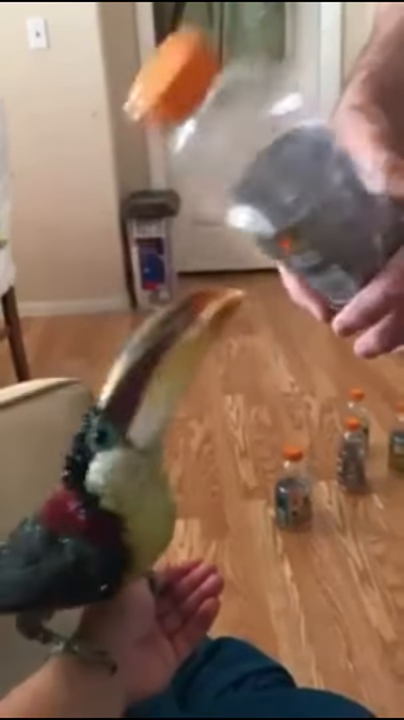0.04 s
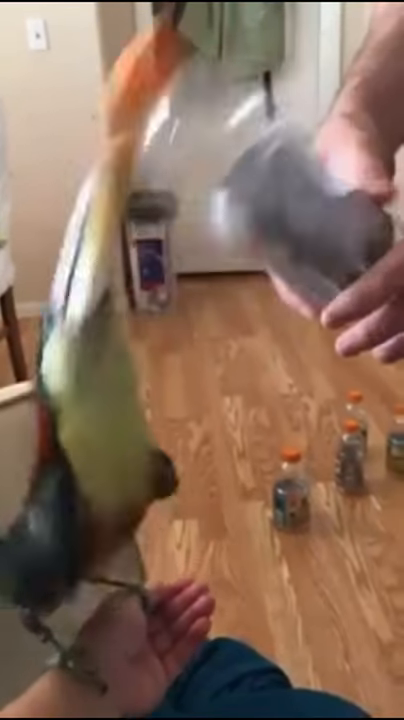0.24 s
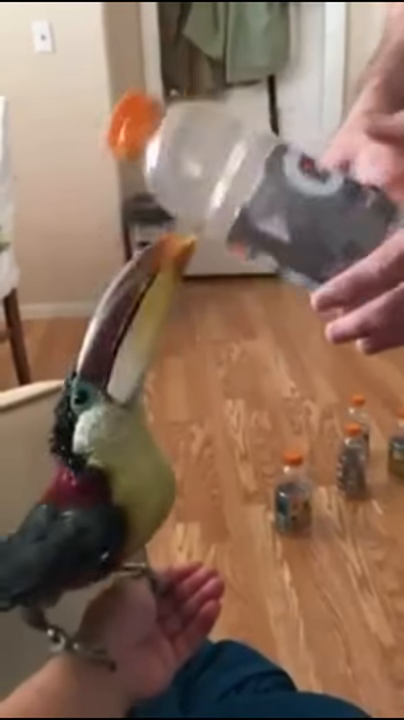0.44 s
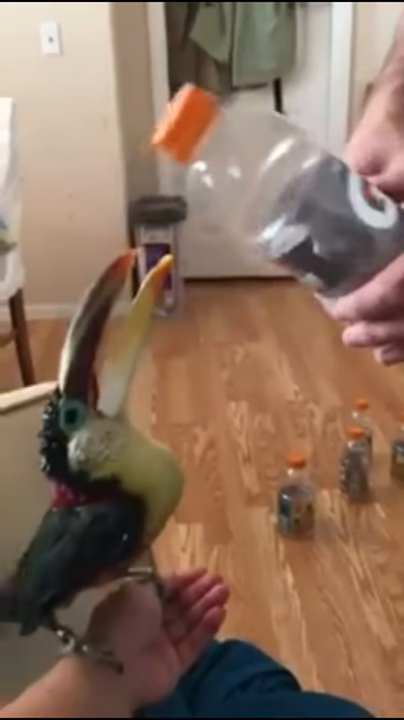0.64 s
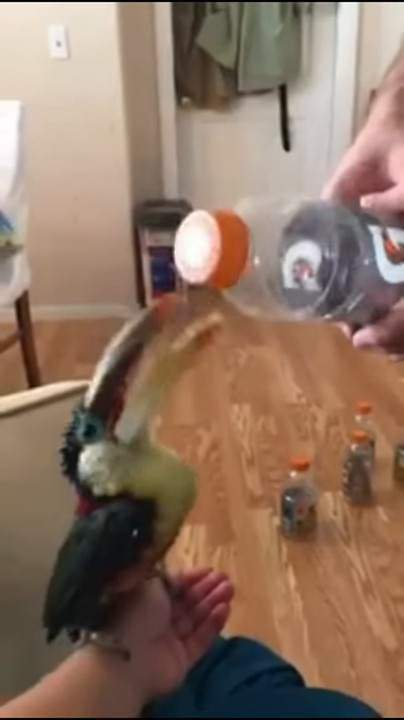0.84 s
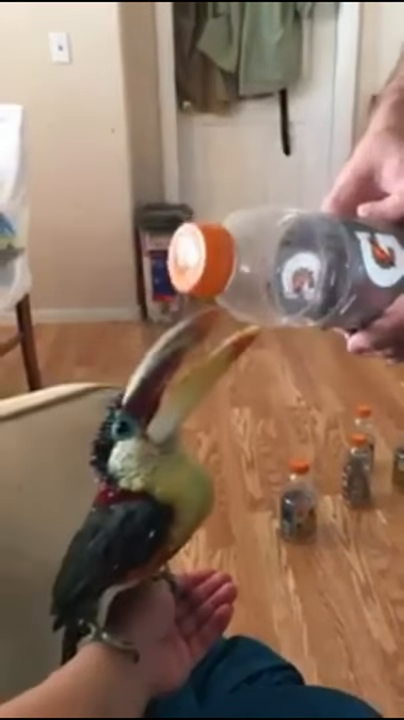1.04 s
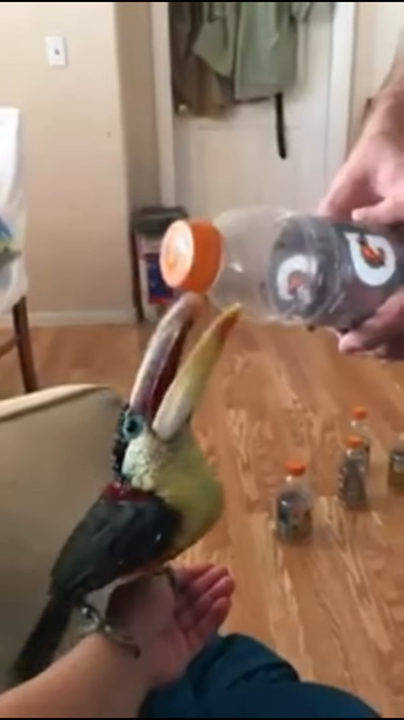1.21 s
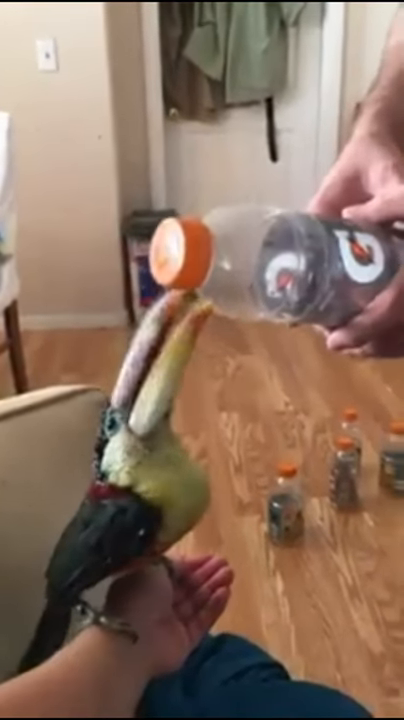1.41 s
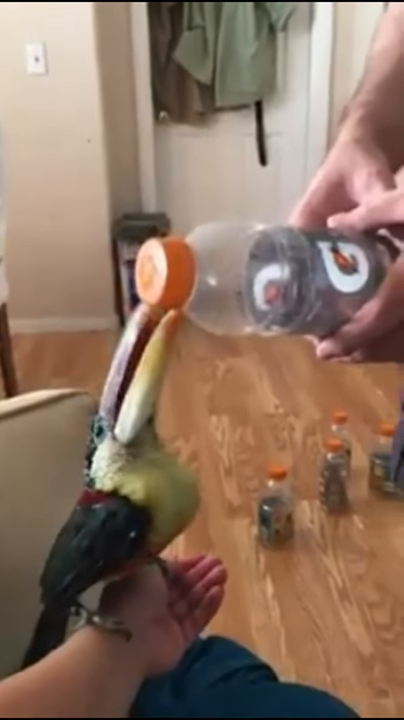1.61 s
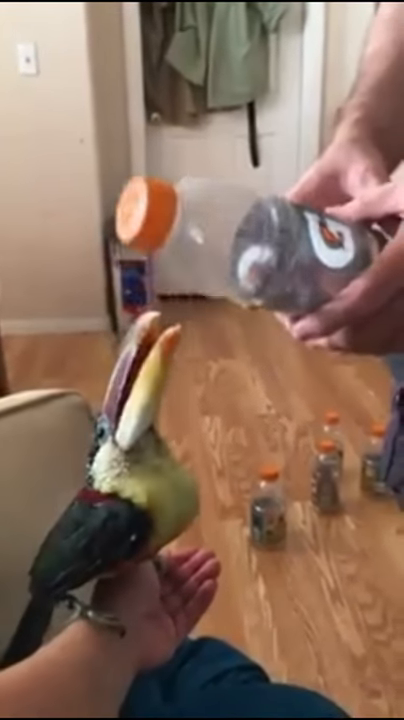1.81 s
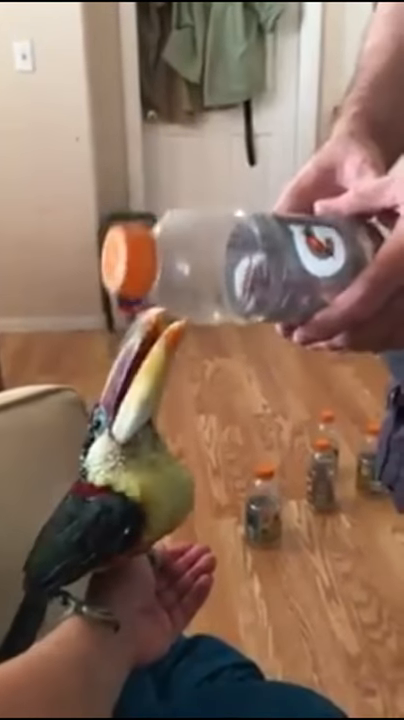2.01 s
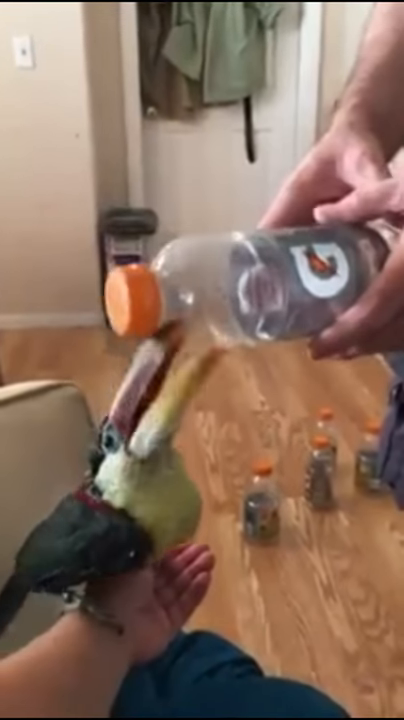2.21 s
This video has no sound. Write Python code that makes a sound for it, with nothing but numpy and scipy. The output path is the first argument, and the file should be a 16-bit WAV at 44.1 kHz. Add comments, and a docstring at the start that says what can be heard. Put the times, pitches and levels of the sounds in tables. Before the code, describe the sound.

A bird's bill knocks on a plastic bottle close by in a small room. An earlier knock fades at the start, then the loudest hit, a quick hollow clatter, comes at about 0.2 seconds. Lighter taps follow near 1.1 seconds, faintly at 1.45, and as a pair around 2.1 and 2.2. Faint handling rustles and ticks fill the gaps over a low, steady hum.

```python
"""A knock is dying away over a low hum in a small room; then a bird raps its bill on a hand-held
plastic bottle near the microphone. Each contact is a brief chatter that cracks, rings the bottle's
wall and gives a hollow knock, and the room answers. Faint rustles and ticks of handling lie
between the blows."""
import sys
import numpy as np
from scipy import signal
from scipy.fft import rfft, irfft
from scipy.io import wavfile

SR = 44100
rng = np.random.default_rng(int(sys.argv[2]) if len(sys.argv) > 2 else 0)


def inscribe(sig):
    """Save sig as 16-bit PCM at rate SR to the path in sys.argv[1].

    A 1-D sig is mono; a 2-D sig holds one channel per row.
    Samples are clipped to [-1, 1] before scaling.
    """
    pcm = np.round(np.clip(np.atleast_2d(sig).T, -1, 1) * 32767)
    wavfile.write(sys.argv[1], SR, pcm.astype(np.int16))


N = 103635
LEAD = 16384  # samples ahead of time zero, so an earlier knock can ring on

# The frequencies in Hz, low to high, at which rustles and ticks have their levels set.
HANDLING_HZ = [900, 2500, 6000, 12000]


def amp(db):
    """Decibels to gain."""
    return 10 ** (np.asarray(db) / 20)


def read(points, hz):
    """Interpolates rows of (Hz, value) on a log-frequency axis."""
    points_hz, values = np.transpose(points)
    return np.interp(np.log(hz + 1), np.log(points_hz), values)


def add(track, start_s, sound):
    """Adds a sound to a track that starts LEAD samples early."""
    part = track[max(LEAD + round(start_s * SR), 0):][:len(sound)]
    part += sound[:len(part)]


def colour(x, points, size=4096):
    """Minimum-phase filter that follows rows of (Hz, dB)."""
    log_gain = np.log(amp(read(points, abs(np.fft.fftfreq(size, 1 / SR)))))
    response = np.exp(np.conj(signal.hilbert(log_gain)))
    taps = np.fft.ifft(response).real[:size // 2]
    return signal.fftconvolve(x, taps)[:len(x)]


def drift(rate_hz):
    """A smooth random wander of rms 1."""
    lowpass = np.exp(-(np.fft.rfftfreq(N, 1 / SR) / rate_hz) ** 2)
    wander = irfft(rfft(rng.standard_normal(N)) * lowpass, N)
    return wander / wander.std()


def low_cut(x, hz):
    """Small objects radiate little bass."""
    return signal.sosfilt(signal.butter(2, hz, "high", fs=SR, output="sos"), x)


def chatter(decay_s, size=2048, rise_s=0.00033):
    """A few milliseconds of rattling contact, with a fairly even spectrum and energy 1."""
    t = np.arange(size) / SR
    fade = (1 - np.exp(-t / rise_s)) * np.exp(-(t / decay_s / 2) ** 1.3)
    gate = np.minimum(1, 2 * fade / fade.max())
    burst = rng.standard_normal(size) * fade
    for _ in range(2):  # flatten the spectrum, then make the burst short again
        spectrum = rfft(burst)
        burst = irfft(spectrum / (abs(spectrum) + 1e-9)) * gate
    return burst / np.linalg.norm(burst)


def bottle_ring(blow, spot_hz, spot_db=9, spot_t60=0.038):
    """A blow plus what it excites: the bottle's modes and the short ring of the struck spot."""
    # Each row: a mode's frequency in Hz, gain at resonance in dB, time to fall 60 dB in seconds.
    wall_modes = [(407.6, 10.5, .26), (639, -1, 0.13), (890.4, -8.5, 0.11), (2040, 2.5, 0.0089),
                  (2143, 2, .09), (2405, -0.5, 0.042), (3153, 2, 0.069), (3850, -7.5, .02),
                  (4610, -10, .025), (5350, 0, .04), (6870, -6, .03)]
    t, ringing = np.arange(len(blow)) / SR, np.zeros(len(blow))
    for hz, db, t60 in [*wall_modes, (spot_hz, spot_db, spot_t60)]:
        damping = np.log(1000) / t60
        ringing += amp(db) * 2 * damping / SR * np.exp(-damping * t) * np.cos(2 * np.pi * hz * t)
    return blow + signal.fftconvolve(blow, ringing)[:len(blow)]


def bill_knocks(size=16384):
    """Each blow of the bill is a double crack and a damped hollow knock; both ring the bottle."""
    # Each row: start in seconds, chatter decay in seconds, the hollow knock's level in dB, pitch in Hz
    # and rise constant in seconds, the struck spot's ring in Hz, then crack dB at each of crack_hz.
    blows = [ (-0.13, 0.004, -12.5, 568, .0012, 3100, 22.5, 18, 14, 13, 15.5, 11),
             (0.1508, 0.0018, -30, 555, 0.0013, 6060, -4, -17, -20, -14, -7, -24),
             (0.2102, 0.0046, -17.5, 587, 0.00039, 3180, 12, 4, 1.5, 3.5, 13, -13),
             (0.2119, 0.0038, -34, 733, 0.00064, 5270, -3, -11, 8, -4, -7, 3.5),
             (0.2195, .0015, -10, 502.4, 0.00075, 3420, 17.5, 13.5, 17.5, 15.5, 18, 2),
             (0.2475, .0014, -29, 500, 0.00094, 7400, -8.5, 2.5, 1.5, 9, 8, 0.5),
             (1.0368, 0.0023, -35, 577, .0015, 6200, -12, -22, -29, -29, -21.5, -40),
             (1.0841, 0.0029, -29, 623, 0.0013, 6280, 1.5, -20, -30.5, -18, -8, -27),
             (1.0870, 0.0021, -21, 709, 0.00077, 1958, 2, -1.5, 3.5, 5, -3.5, -18.5),
             (1.45, 0.00096, -29.5, 578, 0.0012, 2500, -3, -11.5, -14.5, -15, -27.5, -42),
             (2.0584, 0.0027, -29, 715, 0.0009, 6100, -3.5, -4, -9, -14, -10, -29),
             (2.0614, 0.0019, -30.5, 540, 0.0027, 2930, -6, -2, 0.5, 5, -2, -25),
             (2.2038, 0.0019, -26, 570, 0.0014, 1813, -1, 1, 3, -2.5, -10.5, -23.5)]
    # The frequencies in Hz, low to high, that outline a crack's spectrum.
    crack_hz = [400, 1200, 2300, 4000, 6500, 12000]
    rebound_s, rebound_gain = 0.0012844, 0.27  # the wall springs back on the bill
    t, track = np.arange(size) / SR, np.zeros(LEAD + N)
    hollow_t = np.maximum(t - 0.00056, 0)  # the hollow knock starts just after the crack
    for start_s, decay_s, hollow_db, hollow_hz, rise_s, spot_hz, *crack_db in blows:
        crack = colour(chatter(decay_s, size=size), list(zip(crack_hz, crack_db)))
        rebound = rebound_gain * np.interp(t - rebound_s, t, crack, left=0)
        double_crack = (crack + rebound) / np.hypot(1, rebound_gain)
        swell = (hollow_t / rise_s / 2) ** 2 * np.exp(2 - hollow_t / rise_s)
        hollow = amp(hollow_db) * swell * np.sin(2 * np.pi * hollow_hz * hollow_t)
        add(track, start_s, bottle_ring(double_crack + hollow, spot_hz))
    return low_cut(low_cut(track, hz=237), hz=170)


def room_reverb(direct, rise_s=0.0033):
    """The small room returns two near reflections and a diffuse tail that dies band by band."""
    # Each row: frequency in Hz, time for the tail to fall 60 dB in seconds.
    decay_times = [(200, 0.72), (600, 0.4756), (2200, 0.5872), (5000, .5), (9000, 0.31), (15000, 0.06)]
    # Each row: frequency in Hz, level of the tail in dB.
    tail_levels = [(200, -4), (390, -5.5), (500, -15), (750, -6.5), (1200, -3.5), (1700, -9.5), (2000, -5),
                   (2450, -5), (2800, -9), (3500, -11), (4150, -7.5), (5000, -12.5), (7500, -11),
                   (13000, -6)]
    # Each row: a reflection's delay in seconds, its level in dB against the direct sound.
    reflections = [(.0068, -18), (0.0196, -22)]
    hz, t, bands = signal.stft(rng.standard_normal(SR), SR, nperseg=256)
    damping = np.log(1000) / read(decay_times, hz)[:, None]
    fade = np.exp(-damping * t) * np.sqrt(2 * damping / SR)  # unit energy in each band
    bands = bands * fade * amp(read(tail_levels, hz))[:, None]
    response = signal.istft(bands, SR, nperseg=256)[1]
    response *= 1 - np.exp(-(np.arange(len(response)) / SR / rise_s) ** 2)
    for delay_s, db in reflections:
        response[round(delay_s * SR)] += amp(db)
    return signal.fftconvolve(direct, response)[:len(direct)]


def room_tone(waver_db=1, waver_rad=0.15):
    """A wavering appliance hum and the dull, steady noise of the room."""
    # Each row: a hum tone's frequency in Hz, level in dB.
    hum_tones = [(58.3, -54.5), (134.3, -54)]
    # Each row: frequency in Hz, level of the room noise in dB.
    noise_spectrum = [(20, -53), (45, -36.5), (90, -31.5), (170, -36), (330, -34.5), (560, -40), (900, -49),
                      (1400, -50.5), (2300, -57.5), (3600, -67), (6000, -63.5), (9000, -70), (15000, -77.5)]
    t, hum = np.arange(N) / SR, np.zeros(N)
    for hz, db in hum_tones:
        peak = np.sqrt(2) * amp(db + waver_db * drift(rate_hz=1.6))
        hum += peak * np.sin(2 * np.pi * hz * t + waver_rad * drift(rate_hz=2.5))
    return hum + colour(rng.standard_normal(LEAD + N), noise_spectrum)[LEAD:]


def rustles(grain_db=2.5):
    """Hand, plastic and feathers rub in short swells of grainy friction."""
    # Each row: middle in seconds, half length in seconds, then level in dB at each of HANDLING_HZ.
    rubs = [(.12, .06, -56, -47, -52, -61), (.44, 0.054, -58, -50, -52, -64),
            (.6, 0.086, -74, -67, -51, -57.5), (.65, .035, -60, -55, -55, -67),
            (.735, 0.065, -47.5, -51.5, -53.5, -65), (.92, .1, -54, -60, -63.5, -80.5),
            (1.215, 0.028, -57.5, -62, -53, -66), (1.37, 0.035, -38.5, -56.5, -54, -69),
            (1.45, 0.039, -44.5, -58, -63, -79.5), (1.91, 0.058, -54, -54.5, -69.5, -76),
            (2.026, .04, -47, -53, -65, -65)]
    t, track = np.arange(N) / SR, np.zeros(N)
    for middle_s, half_s, *levels_db in rubs:
        grains = rng.standard_normal(N) * amp(grain_db * drift(rate_hz=220))
        swell = np.exp(-((t - middle_s) / half_s) ** 2 / 2)
        track += colour(grains / grains.std(), list(zip(HANDLING_HZ, levels_db))) * swell
    return low_cut(track, hz=250)


def ticks():
    """Claws and fingers make light contacts that hardly ring."""
    # Each row: start in seconds, then level in dB at each of HANDLING_HZ.
    touches = [(.4165, -9.5, -25, -17, -41), (0.5156, -14, -16.5, -9.5, -28), (.5425, -20.5, -18, -23, -37),
               (0.677, -28, -24, -20, -39), (0.792, -9, -15, -30.5, -37), (.8115, -13.5, -19, -27.5, -47),
               (.9375, -28.5, -21.5, -37.5, -43.5), (0.972, -26.5, -25, -32.5, -44.5),
               (1.341, -6, -33, -33, -40), (1.3535, -13.5, -38, -21.5, -49.5), (1.404, -3, -29, -33, -44),
               (1.6954, -11, -33, -39, -46.5), (1.978, -19, -26, -30.5, -43),
               (2.1007, -20.5, -34.5, -12.5, -27.5), (2.11, -6, -18, -11, -34)]
    track = np.zeros(LEAD + N)
    for start_s, *levels_db in touches:
        add(track, start_s, colour(chatter(decay_s=0.0026), list(zip(HANDLING_HZ, levels_db))))
    return low_cut(track, hz=300)


def scene():
    """At the microphone: near knocks and ticks with the room's answer, dry rustles and room tone."""
    direct = bill_knocks() + ticks()
    contacts = (direct + room_reverb(direct))[LEAD:]
    return (contacts + rustles() + room_tone())[None]


def record(dry):
    """One microphone colours the treble; its signal clips at full scale and is then band-limited."""
    # Each row: frequency in Hz, the microphone's gain in dB.
    mic_response = [(8000, -2), (12500, 1), (15500, -6.5)]
    clipped = np.clip(colour(dry[0], mic_response), -1, 1)
    lowpass = signal.firwin(301, cutoff=15350, window=("kaiser", 8), fs=SR)
    return signal.oaconvolve(clipped[None], lowpass[None], "same")


dry = scene()
out = record(dry)
inscribe(out)
```